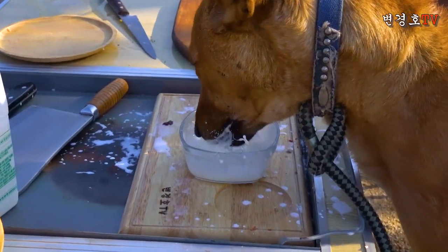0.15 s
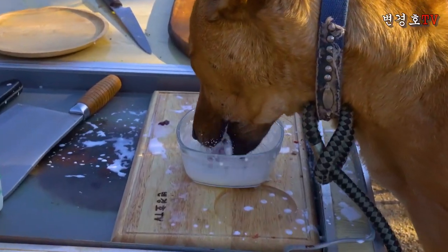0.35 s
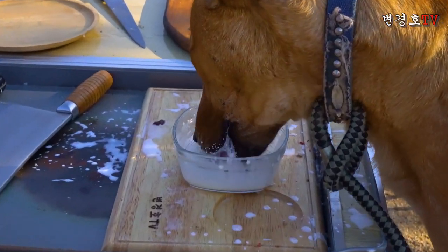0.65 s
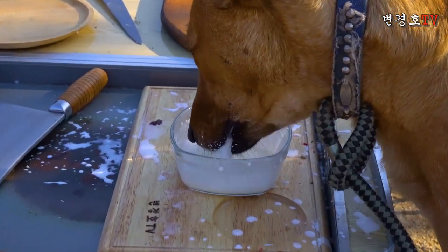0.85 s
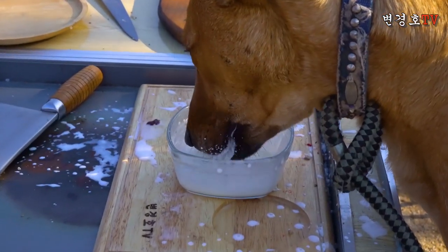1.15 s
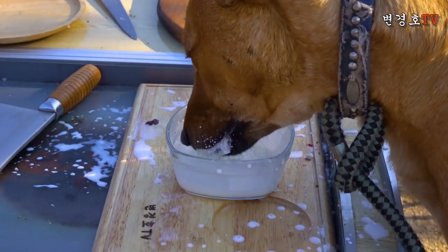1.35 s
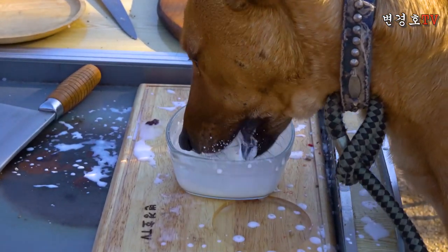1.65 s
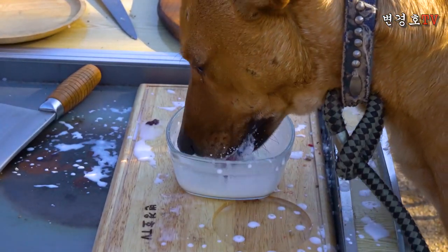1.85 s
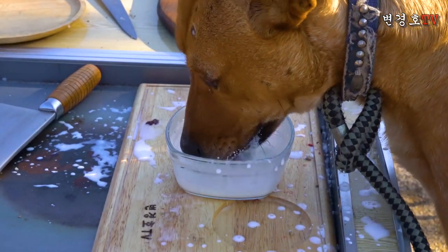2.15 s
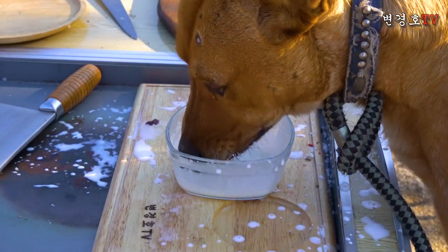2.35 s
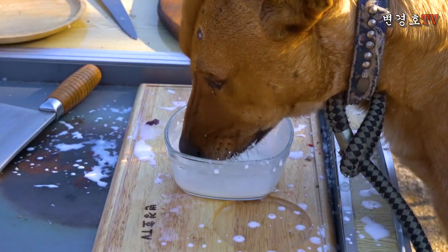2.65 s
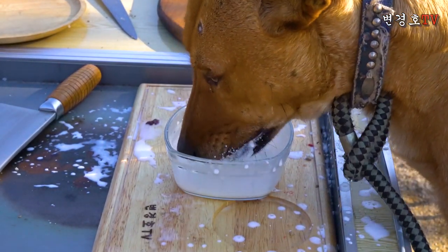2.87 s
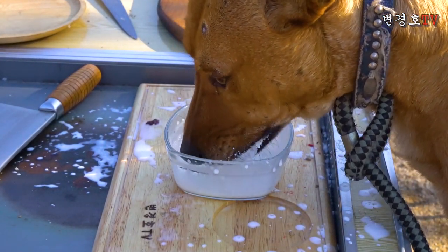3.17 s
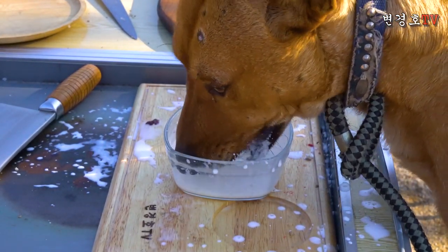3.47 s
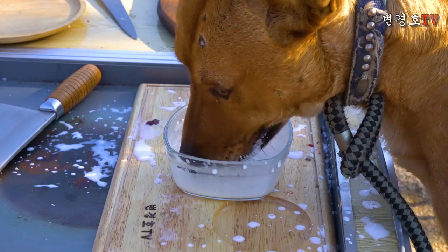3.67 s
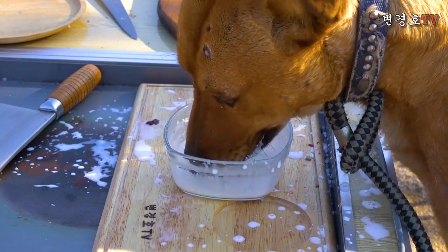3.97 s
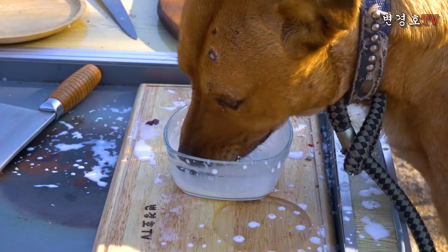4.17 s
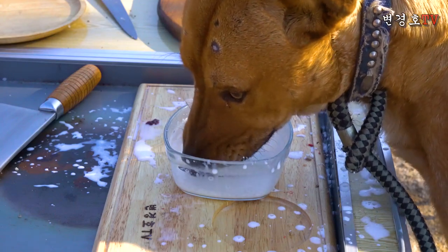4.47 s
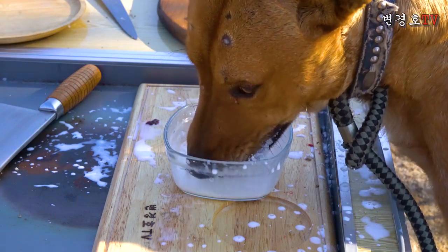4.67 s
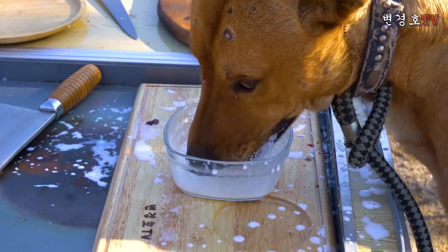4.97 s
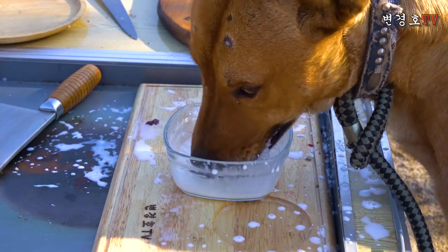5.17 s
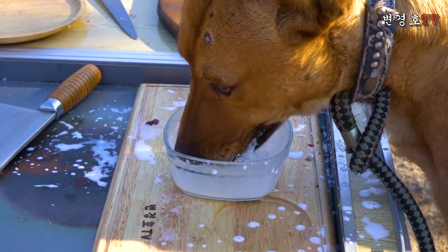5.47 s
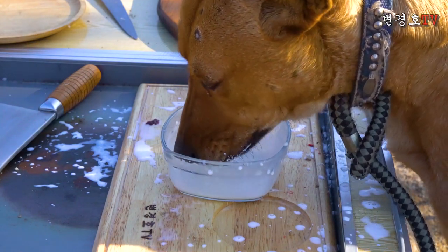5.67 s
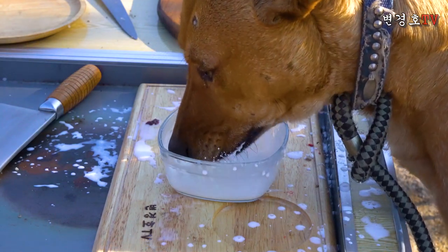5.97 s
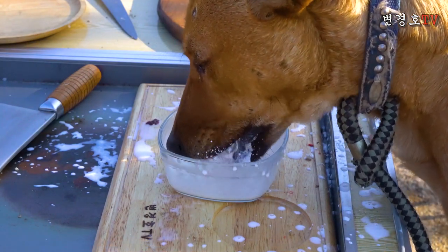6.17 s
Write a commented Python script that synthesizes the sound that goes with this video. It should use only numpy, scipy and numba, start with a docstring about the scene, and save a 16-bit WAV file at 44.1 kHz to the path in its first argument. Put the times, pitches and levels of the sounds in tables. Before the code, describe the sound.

A dog laps milk from a glass bowl on a wooden board, heard at arm's length outdoors. Fast, slightly uneven wet strokes of three or four per second, each a hollow bubbly plop with sloshing and bright droplet snaps. Soft low gulps come between, with two faint nose puffs near 2.5 and 4.6 seconds. Close stereo microphone, dry open air, soft steady hiss and faint rumble.

```python
"""Outdoors, at arm's length, a dog laps milk from a glass bowl on a wooden board.
Each stroke closes air pockets, heard as damped sines with slightly rising pitch, amid crowds of slosh
bubbles; drops and films snap with high, short rings, and thousands of small bubbles make the froth.
Gulps are rounded knocks rising in pitch, snorts are noise through nasal resonances, and lone drops ring.
Filtered noise makes the soft stereo hiss and the low rumble beneath."""
import sys
import numpy as np
from scipy import signal
from scipy.fft import rfft, irfft
from scipy.io import wavfile
from scipy.ndimage import uniform_filter1d
from numba import njit

SR = 44100
rng = np.random.default_rng(int(sys.argv[2]) if len(sys.argv) > 2 else 0)


def dump(signal):
    """Clip the signal to [-1, 1] and save it as 16-bit WAV at the path in sys.argv[1]."""
    limited = np.clip(np.atleast_2d(signal).T, -1, 1)
    pcm = np.round(limited * 32767).astype(np.int16)
    wavfile.write(sys.argv[1], SR, pcm)


N = 278712

# air pockets closed by tongue and lips: t/s, peak level/dB, f/Hz
POCKET_EVENTS = [(.113, -37, 800), (.1678, -14, 1400), (.1695, -22.5, 590), (.195, -31, 1060),
                 (.2178, -29, 1030), (.2365, -19, 1045), (.2557, -26, 940), (.285, -32, 1150),
                 (.369, -35.5, 1240), (.4488, -27, 1240), (.4537, -15.5, 1970), (.4996, -28.5, 810),
                 (.5131, -27, 806), (.526, -30, 1570), (.5409, -28, 1040), (.5559, -20, 1190),
                 (.7739, -16, 2020), (.8116, -20.5, 910), (.8512, -31, 1090), (.8738, -23.5, 1040),
                 (.879, -29, 1030), (.983, -36.5, 1180), (1.049, -11.5, 1310), (1.0608, -21, 950),
                 (1.0685, -25, 870), (1.1346, -23, 990), (1.1498, -27.5, 1000), (1.286, -38.5, 1170),
                 (1.3505, -28, 940), (1.4184, -27, 980), (1.4441, -23.5, 1015), (1.5417, -31, 1210),
                 (1.6213, -27, 1240), (1.626, -25, 1500), (1.6311, -27, 1120), (1.6766, -10.5, 1155),
                 (1.686, -29, 1410), (1.752, -32.5, 575), (1.7805, -26.5, 1060), (1.788, -30, 1050),
                 (1.906, -39.5, 590), (1.9604, -23, 1220), (1.9805, -30, 700), (2.037, -36.5, 629),
                 (2.065, -23.5, 1200), (2.1945, -28, 740), (2.282, -35, 1376), (2.3044, -24.5, 1170),
                 (2.3676, -37.5, 680), (2.3976, -25.5, 1080), (2.412, -31, 1060), (2.417, -27, 970),
                 (2.504, -33, 1230), (2.5992, -18.5, 900), (2.6431, -27, 560), (2.6569, -21, 1200),
                 (2.6778, -23, 1110), (2.697, -31.5, 770), (2.8804, -16, 1110), (2.9267, -22.5, 760),
                 (2.9512, -23, 768), (2.9736, -21, 1000), (2.9845, -26, 1010), (2.998, -35, 1024),
                 (3.1729, -24.5, 1070), (3.2165, -36, 770), (3.2556, -18, 895), (3.2852, -31.5, 860),
                 (3.33, -29, 935), (3.4559, -18, 1520), (3.493, -31.5, 940), (3.505, -29.5, 945),
                 (3.5237, -26.5, 1450), (3.5583, -23.5, 893), (3.5972, -27.5, 1200), (3.605, -33, 1130),
                 (3.793, -35, 730), (3.88, -30, 1055), (4.0644, -25.5, 1200), (4.09, -32, 1170),
                 (4.127, -23, 1150), (4.234, -24.5, 1220), (4.3385, -21.5, 1160), (4.362, -32, 720),
                 (4.379, -33.5, 1164), (4.4641, -24.5, 800), (4.5098, -25, 1020), (4.538, -35.5, 955),
                 (4.633, -33, 740), (4.6998, -19, 1600), (4.712, -33, 734), (4.7511, -25, 723),
                 (4.7592, -24.5, 800), (4.7957, -30, 890), (4.837, -36, 766), (4.8957, -27.5, 1630),
                 (4.9756, -22.5, 805), (5.037, -31, 870), (5.127, -27, 896), (5.154, -31, 1040),
                 (5.2309, -22.5, 1500), (5.2535, -19, 1290), (5.305, -37.5, 1160), (5.366, -35.5, 805),
                 (5.41, -37, 780), (5.442, -31, 930), (5.499, -33, 990), (5.5954, -26, 895),
                 (5.61, -33, 780), (5.691, -29.5, 950), (5.707, -31.5, 880), (5.8877, -19.5, 920),
                 (6.0108, -27.5, 870), (6.0337, -30, 865), (6.089, -39, 1030), (6.127, -39, 824),
                 (6.19, -34, 1100), (6.2591, -25.5, 740), (6.291, -30, 904), (6.304, -40, 725)]
# froth between strokes and muzzle position: t/s, level/dB before the layer offsets, left minus right/dB
FROTH_AND_SIDE = [(0.0, -47, -0.5), (1.34, -45, -3), (2.76, -44, -1.5), (3.03, -48.5, -2.5), (4.43, -43, 0),
                  (6.32, -47.5, -0.5)]
# background: t/s, hiss body level/dB, hiss treble level/dB, rumble level/dB, all before random wavering
AIR_LEVELS = [(0, -49, -53.5, -71), (.1, -45.5, -48.5, -70), (.37, -52.5, -44.5, -62),
              (.5, -48.5, -52, -62), (1.05, -53, -52, -64.5), (1.46, -53.5, -55, -54.5),
              (1.81, -49.5, -54.5, -58), (2.27, -51, -52.5, -71.5), (2.83, -48, -53, -64.5),
              (3.24, -54.5, -54.5, -58.5), (3.59, -52.5, -53.5, -52), (3.95, -50.5, -51.5, -63.5),
              (4.3, -48, -51, -59), (4.46, -48, -49.5, -73), (4.7, -48.5, -52, -59), (5.3, -48.5, -49, -80),
              (5.42, -50, -49.5, -58.5), (5.65, -52, -49, -49.5), (6.0, -52, -50, -72),
              (6.32, -52, -49.5, -48)]


def undb(db):
    """Amplitude gain from the logarithmic level in dB."""
    return 10 ** (np.asarray(db) / 20)


def curve(rows, column):
    """Linear interpolation in time of one table column."""
    rows = np.array(rows)
    return np.interp(np.arange(N) / SR, rows[:, 0], rows[:, column])


def along(points):
    """Interpolation on a logarithmic frequency axis at every transform bin; end values are held."""
    hz, value = np.transpose(points)
    return np.interp(np.log(np.fft.rfftfreq(N, 1 / SR) + 1), np.log(hz), value)


def unit(x):
    """Normalization to an rms amplitude of 1."""
    return x / np.sqrt(np.mean(x ** 2))


def walk(rate):
    """Random modulation: a new level every 1 / rate s, slewed between, with rms 1."""
    hold = int(SR / rate)
    levels = np.repeat(rng.standard_normal(N // hold + 1), hold)
    return unit(uniform_filter1d(levels, hold)[:N])


@njit
def grains(start, hz, t60, rise, glide, left, right):
    """Damped oscillation: exponential decay of 60 dB over t60, a swell, and a glide in octaves."""
    out = np.zeros((2, N))
    for e in range(len(start)):
        n = int(t60[e] * SR)
        fall, swell = np.exp(-np.log(1000) / n), np.exp(-1 / (rise[e] * SR))
        step, bend = 2 * np.pi * hz[e] / SR, 2 ** (glide[e] / n)
        phase, decay, unrisen, first = 0., 1., 1., int(start[e] * SR)
        for i in range(first, min(first + n, N)):
            decay, unrisen = decay * fall, unrisen * swell
            step = min(step * bend, 2.4)  # radians per sample
            phase += step
            v = decay * (1 - unrisen) ** 2 * np.sin(phase)
            out[0, i] += left[e] * v
            out[1, i] += right[e] * v
    return out


def ring(s, db, hz, t60, rise, glide, pan_db):
    """Superposition of damped oscillations, envelope peaks set to db; pan_db is left minus right."""
    settings = np.broadcast_arrays(s, db, hz, t60, rise, glide, pan_db)
    s, db, hz, t60, rise, glide, pan_db = (1. * a.ravel() for a in settings)
    t60, rise = np.clip(t60, 1e-3, .3), np.clip(rise, 2e-5, .05)
    # peak of the swell times the decay
    ratio = rise * np.log(1000) / t60
    top = (ratio / (2 + ratio)) ** ratio * (2 / (2 + ratio)) ** 2
    left, right = undb(db + pan_db / 2) / top, undb(db - pan_db / 2) / top
    return grains(s, hz, t60, rise, glide, left, right)


def burst(s, length, db, hz, down_oct, up_oct, cycles, scatter_db, pan_db, count):
    """Incoherent bubble sum: quick onset, trailing end; nominal power is independent of count."""
    early, late, tone, size, side, bend = np.moveaxis(rng.random((len(s), count, 6)), 2, 0)
    pitch = np.clip(hz * 2 ** ((down_oct + up_oct) * tone - down_oct), 40, 15000)
    share_db = 10 * np.log10(28 * length * pitch / cycles / count)
    each_db = db + share_db - scatter_db * (1 + np.log(1 - .99 * size))
    lag = -.4 * np.log(1 - .98 * late)
    start = s + length * (.7 * early + lag - .7)
    t60, rise = cycles / pitch, 0.093 * cycles / pitch
    # stragglers are fainter
    return ring(start, each_db - 5 * lag, pitch, t60, rise, bend - .4, pan_db * (2 * side - 1))


def bubbling(level_db, low_hz, high_hz, cycles, scatter_db, count):
    """Random superposition of many small bubbles, a few much stronger than the rest."""
    when, tone, size, side, bend = rng.random((count, 5)).T
    hz = low_hz * (high_hz / low_hz) ** tone
    db = -scatter_db * np.log(1 - size * .97)
    cloud = ring(when * N / SR, db, hz, cycles / hz, 1.5 / hz, bend - .3, 5 * (side - .5))
    return unit(cloud) * undb(level_db)


def air():
    """Partly correlated stereo noise, its body and treble modulated independently."""
    # hiss spectrum: f/Hz, relative spectral level/dB
    hiss_shape = [(150, -29), (250, -3.5), (574, -0.5), (1070, 2), (1460, 0), (1620, 0.5), (3480, -4.5),
                  (8270, -5), (14600, -12.5), (15700, -9)]
    # correlation of the two sides: f/Hz, share (0-1)
    shared_part = [(100, 1), (500, 0.86), (1500, 0), (4000, 0), (12000, 0.04)]
    treble_from_hz, split_hz = 4700, 2000
    alike = np.clip(along(shared_part), 0, .99)
    mid, side = rfft(rng.standard_normal((2, N)))
    both = mid * np.sqrt(1 + alike) + side * np.sqrt(1 - alike) * np.array([[1], [-1]])
    f = np.fft.rfftfreq(N, 1 / SR)
    both = both * undb(along(hiss_shape)) * (f < hiss_shape[-1][0])
    low = 1 / (1 + (f / treble_from_hz) ** 4)
    lower = 1 / (1 + (f / split_hz) ** 4)
    # the two parts of the body waver separately
    body = sum(irfft(both * low * part, N) * undb(2.6 * walk(16)) for part in (lower, 1 - lower))
    body = unit(body) * undb(curve(AIR_LEVELS, 1))
    treble = unit(irfft(both * (1 - low), N))
    return body + treble * undb(curve(AIR_LEVELS, 2) + 1.0 * walk(15))


def rumble():
    """Low-frequency shaped noise from the table, with random amplitude modulation."""
    # rumble spectrum: f/Hz, relative spectral level/dB
    rumble_shape = [(15, -56), (25, -23), (63, -3), (102, -1.5), (182, -1), (400, -11.5), (520, -17),
                    (880, -120)]
    low = unit(irfft(rfft(rng.standard_normal(N)) * undb(along(rumble_shape)), N))
    waver_db = 3.5 * walk(30)
    return low * undb(curve(AIR_LEVELS, 3) + waver_db)


def froth():
    """Bubble resonance: large bubbles gurgle low and small ones fizz high, wavering as the milk rocks."""
    level_db = curve(FROTH_AND_SIDE, 1) + 2.0 * walk(15)
    gurgle = bubbling(level_db - 11.0, 477, 2030, 18.4, 10.2, count=3000)
    fizz = bubbling(level_db - 19.5, 1940, 6740, 35.0, 15.0, count=6000)
    return gurgle + fizz


def sloshes():
    """Bubble resonance round the tongue: a gurgle near the pocket pitch, spray above, mist on top."""
    # milk sloshing round the tongue: middle t/s, length/s, nominal gurgle level/dB
    slosh_events = [(0.106, 0.017, -47), (0.169, 0.022, -38.5), (0.246, 0.055, -41), (0.458, 0.012, -28),
                    (0.542, 0.03, -38), (0.784, 0.02, -37), (0.883, 0.026, -39.5), (1.067, 0.024, -42),
                    (1.162, 0.027, -40.5), (1.349, 0.025, -43.5), (1.44, 0.029, -42), (1.681, 0.022, -44.5),
                    (1.751, 0.016, -47.5), (1.789, 0.012, -47), (1.968, 0.024, -43), (2.06, 0.032, -46),
                    (2.166, 0.013, -43), (2.406, 0.048, -45.5), (2.605, 0.026, -37.5),
                    (2.649, 0.015, -41.5), (2.686, 0.042, -46), (2.885, 0.019, -30.5),
                    (2.973, 0.048, -47.5), (3.169, 0.021, -44.5), (3.27, 0.023, -42.5),
                    (3.457, 0.0081, -34), (3.599, 0.028, -47), (3.792, 0.022, -50.5), (3.888, 0.021, -46),
                    (4.069, 0.02, -40), (4.131, 0.023, -45), (4.35, 0.027, -42), (4.511, 0.015, -45),
                    (4.706, 0.018, -41.5), (4.755, 0.015, -44), (4.794, 0.024, -43.5),
                    (4.905, 0.022, -51.5), (4.978, 0.015, -39.5), (5.04, 0.02, -47), (5.138, 0.032, -43.5),
                    (5.238, 0.028, -42.5), (5.411, 0.014, -41.5), (5.507, 0.016, -51.5), (5.609, 0.02, -45),
                    (5.703, 0.033, -50.5), (5.884, 0.014, -46.5), (6.013, 0.01, -44.5),
                    (6.199, 0.021, -46.5), (6.298, 0.03, -46)]
    s, length, db = np.transpose(slosh_events)[:, :, None]
    pocket_s, _, pocket_hz = np.transpose(POCKET_EVENTS)
    hz = np.interp(s, pocket_s, pocket_hz)
    # spray is -45.5 dB for a -40 dB slosh and gains 0.78 dB per dB of slosh
    spray_db = -45.5 + 0.78 * (db + 40)
    gurgle = burst(s, length, db, np.minimum(hz, 1500), 0.86, 0.69, 6.3, 2.44, 4.7, count=32)
    spray = burst(s, length, spray_db, 3000, 0.923, 0.9, 13, 3.07, 10.8, count=60)
    mist = burst(s, length, spray_db - 12, 8500, 0.574, 0.44, 24, 4.8, 11.0, count=30)
    return gurgle + spray + mist


def pockets(after_db=-14, after_s=0.00788, spread_oct=0.44, rise_oct=0.012, count=3):
    """Resonance of trapped air: each pocket rises slightly in pitch; fainter ones break off after it."""
    s, db, hz = np.transpose(POCKET_EVENTS)[:, :, None]
    t60 = 9.9 / hz  # 9.9 cycles per 60 dB of decay
    late, size, tone, bend = np.moveaxis(rng.random((len(s), count, 4)), 2, 0)
    swell = .9 / hz
    main = ring(s - swell / 2, db, hz, t60, swell, rise_oct, 3 * (tone[:, :1] - .5))
    small_hz = hz * 2 ** (spread_oct * (2 * tone - 1))
    small_db = db + after_db + 4 * size
    small = ring(s + after_s * late, small_db, small_hz, 2.8 * t60, 0.057 / hz, bend - .5, 0)
    return main + small


def snaps(after_db=-13, after_s=.004, edge_s=0.0033, count=8):
    """Impulsive excitation: a short ring, scattered spray and a high edge of tiny drops."""
    # drops and films that snap: t/s, peak level/dB, f/Hz, edge level over peak/dB before a 13 dB cut
    snap_events = [(0.1534, -26.5, 2740, 5.5), (0.1718, -22, 2170, -20), (.237, -35, 4730, -20),
                   (0.258, -34, 2926, -20), (0.269, -25, 4100, 3), (0.4495, -18.5, 4380, -1),
                   (0.486, -28.5, 3560, -5), (0.5298, -25.5, 4270, -4), (0.541, -27, 2150, -25),
                   (0.5538, -18, 6030, -1), (0.649, -28, 5400, -6), (0.7755, -12, 3050, -19),
                   (0.8015, -23.5, 3400, -8), (0.8113, -27, 2740, -26), (.88, -30.5, 8500, -17),
                   (1.0488, -16, 2920, -7.5), (1.105, -35, 5000, 3), (1.17, -31.5, 3040, -24),
                   (1.3648, -28, 3200, -17), (1.3746, -26.5, 3980, -3), (1.439, -36, 4140, -15),
                   (1.572, -42, 2780, -25), (1.623, -29.5, 5000, -6), (1.656, -39, 2200, -8),
                   (1.708, -30, 3720, 2.5), (1.748, -26, 3750, -4), (1.788, -31.5, 2595, -25),
                   (1.843, -37.5, 2850, 2), (1.9642, -24.5, 5620, -26), (1.991, -25.5, 3940, -8),
                   (2.069, -28, 5150, -20), (2.1948, -26, 3050, 0.5), (2.3006, -15, 3300, -38),
                   (2.334, -30, 2200, -17), (2.428, -28, 3130, -25), (2.589, -24, 2060, -28),
                   (2.5949, -24, 4040, -30), (2.599, -21, 2620, -2), (2.677, -30, 3180, -20),
                   (2.697, -27, 2670, -12), (2.872, -26, 3050, -27), (2.878, -17.5, 3050, -32),
                   (2.897, -33, 4200, 4), (2.9264, -34, 3520, 4), (2.9787, -26, 2840, -7),
                   (3.028, -40, 6000, 5), (3.1353, -31, 1950, -4), (3.1992, -27.5, 3490, -25),
                   (3.3296, -26.5, 2780, -26), (3.4573, -26, 5230, 1.5), (3.494, -38, 2720, -20),
                   (3.51, -34, 3900, -20), (3.526, -32, 2770, -22), (3.605, -36.5, 6500, -20),
                   (3.725, -34, 2930, -20), (3.793, -30, 2510, -17), (3.812, -28, 4400, -12.5),
                   (3.821, -26, 8160, -23), (3.855, -28.5, 6930, -27), (3.882, -27, 4900, -24),
                   (3.967, -25.5, 2320, -15), (4.061, -16.5, 6100, -3), (4.0647, -19, 2700, -18),
                   (4.0736, -19.5, 3800, -4), (4.091, -37, 2257, -25), (4.12, -27, 5500, -21),
                   (4.1263, -26.5, 2880, -23), (4.234, -31.5, 2980, -25), (4.242, -33, 2793, -27),
                   (4.3283, -26, 2580, -26), (4.3401, -18, 2440, -26), (4.361, -34, 6160, -20),
                   (4.406, -31, 2100, -20), (4.412, -32.5, 5750, -20), (4.42, -34, 2400, -25),
                   (4.441, -30, 2730, -20), (4.448, -34, 5800, -20), (4.489, -34, 4500, -20),
                   (4.518, -34.5, 5800, -20), (4.6984, -17, 4300, -30), (4.7, -19, 2730, -35),
                   (4.727, -29, 3640, -21), (4.757, -25.5, 4840, -26), (4.785, -30, 4050, -32),
                   (4.7945, -24.5, 3650, -32), (4.803, -21, 4070, -27), (4.8943, -22.5, 2250, -32),
                   (4.909, -26, 3020, -10), (4.9743, -24.5, 2240, -23), (5.044, -30, 4180, -25),
                   (5.1276, -25, 3790, -32), (5.14, -30, 2380, -21), (5.159, -34.5, 2160, -25),
                   (5.2262, -19.5, 2340, -31), (5.234, -23.5, 2560, -32), (5.239, -28, 2640, -32),
                   (5.24, -18, 2730, -36), (5.2535, -17, 3200, -0.5), (5.253, -25, 13400, -20),
                   (5.319, -36, 3500, -20), (5.331, -34, 4300, -20), (5.345, -30.5, 3740, -5),
                   (5.4073, -28, 3600, -22), (5.622, -31, 6300, -8), (5.687, -28.5, 2220, -14),
                   (5.72, -35, 2100, -20), (5.888, -30, 4140, -20), (5.905, -30, 3680, -22),
                   (5.9247, -27.5, 5950, -20), (5.94, -24, 3350, -10), (6.197, -26.5, 2730, -23),
                   (6.207, -27, 4640, -20), (6.2334, -28, 3740, -7)]
    t60, swell_cycles = 0.0048, .9  # s, cycles
    s, db, hz, top_db = np.transpose(snap_events)[:, :, None]
    late, tone, side, high = np.moveaxis(rng.random((len(s), count, 4)), 2, 0)
    pan_db = 0.3 + 6 * (side - .5)
    swell = swell_cycles / hz
    main = ring(s - swell, db, hz, t60, swell, 0.16, pan_db[:, :1])
    spray_hz = hz * 2 ** (0.942 * (tone - .5))
    spray_db = db + after_db - 5 * late
    spray = ring(s + after_s * late, spray_db, spray_hz, 2.46 * t60, swell, 0.4, pan_db)
    edge_hz = 6500 + 9000 * high
    edge = ring(s + 0.0024 * late, db + top_db - 13, edge_hz, edge_s, 0.00044, 0, pan_db)
    return main + spray + edge


def gulps():
    """Heavily damped resonance: rounded knocks rise in pitch, with faint lower bubbles around them."""
    # gulps and soft thuds through the board: t/s, peak level/dB, f/Hz
    gulp_events = [(0.6605, -35.5, 260), (0.6995, -24.5, 330), (1.086, -30.5, 238), (1.15, -34, 150),
                   (1.3404, -29.5, 243), (1.575, -35.5, 197), (1.654, -26.5, 227), (2.942, -32, 158),
                   (3.4253, -23.5, 290), (3.74, -34, 178), (3.751, -26.5, 185), (3.7638, -30, 274),
                   (3.773, -29, 212), (3.789, -32.5, 196), (4.315, -32.5, 212), (4.3542, -28, 205),
                   (4.614, -31.5, 237), (4.644, -32.5, 214), (4.6614, -30, 340), (5.6391, -27, 209),
                   (5.846, -30.5, 286)]
    s, db, hz = np.transpose(gulp_events)[:, :, None]
    # 60 dB of decay in 2.6 cycles
    plop = ring(s - 0.81 / hz, db, hz, 2.6 / hz, 0.43 / hz, 0.55, 0)
    wobble = burst(s + 0.00802, 0.0264, db - 23.5, 0.61 * hz, 0.22, 0.61, 3.0, 0.45, .8, count=6)
    return plop + wobble


def snorts():
    """Turbulence noise filtered by nasal resonances, fluttering at random against the milk."""
    # air blown from the nose: middle t/s, length/s between 1/e points, level/dB before the flutter
    snort_events = [(2.537, 0.19, -42), (4.632, 0.13, -37)]
    # nasal resonances: f/Hz, width/Hz, relative level/dB
    nose_modes = [(1360, 61, 18.5), (2060, 740, 6), (2840, 2070, 11.5), (4280, 1200, -1)]
    t = np.arange(N) / SR
    gain = sum(undb(db) * np.exp(-(2 * (t - s) / length) ** 2) for s, length, db in snort_events)
    f = np.fft.rfftfreq(N, 1 / SR)
    nose = sum(undb(db) / (1 + 1j * (f - hz) / width) ** 2 for hz, width, db in nose_modes)
    breath = unit(irfft(rfft(rng.standard_normal(N)) * nose, N))
    return breath * undb(2.2 * walk(150)) * gain


def drips():
    """Lightly damped resonance: lone drops ring clearly for a moment."""
    # lone drops: t/s, peak level/dB, f/Hz
    drip_events = [(2.851, -33, 2070), (5.053, -35.5, 4620)]
    s, db, hz = np.transpose(drip_events)
    return ring(s, db, hz, 0.04, 0.00097, .06, 0)  # 60 dB of decay in 0.04 s


def scene():
    """Superposition of direct sound, reflections and interaural-like phase at two ports, in open air."""
    # reflections from board, table and the dog's chest: left delay/s, right delay/s, level/dB
    reflections = [(.0012, .0017, -15), (.0041, .0047, -20)]
    # the right port hears the bowl a little earlier: f/Hz, phase lead of the left/rad
    port_phase = [(60, -.4), (200, -.95), (400, -.8), (650, -.5), (1000, -.4), (1600, -.35), (2500, -.05),
                  (16000, -.01)]
    bowl_from_hz = 164  # small bubbles radiate no bass
    bowl = pockets() + snaps() + drips() + sloshes() + froth() + snorts()
    f = np.fft.rfftfreq(N, 1 / SR)
    echo = 1 + sum(undb(db) * np.exp(-2j * np.pi * f * np.array([[left_s], [right_s]]))
                   for left_s, right_s, db in reflections)
    bass_cut = 1 + (bowl_from_hz / (f + 1)) ** 4
    pan = undb(curve(FROTH_AND_SIDE, 2) * np.array([[.5], [-.5]]))
    bowl = irfft(rfft(bowl) * echo / bass_cut, N) * pan
    ports = np.exp(.5j * along(port_phase) * np.array([[1], [-1]]))
    return irfft(rfft(bowl + gulps() + rumble()) * ports, N) + air()


def record(dry):
    """Band limitation: a high-pass at 62 Hz and a steep low-pass at 16.7 kHz."""
    thin = signal.sosfilt(signal.butter(3, 62, "high", fs=SR, output="sos"), dry)
    return signal.sosfilt(signal.ellip(10, .2, 70, 16700, fs=SR, output="sos"), thin)


dry = scene()
out = record(dry)
dump(out)
```